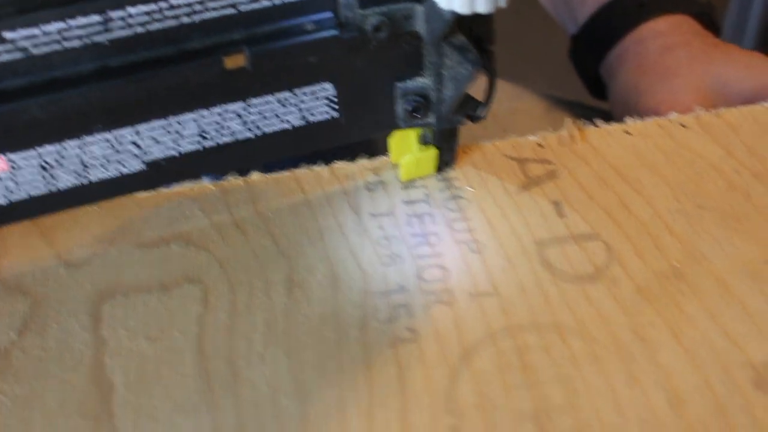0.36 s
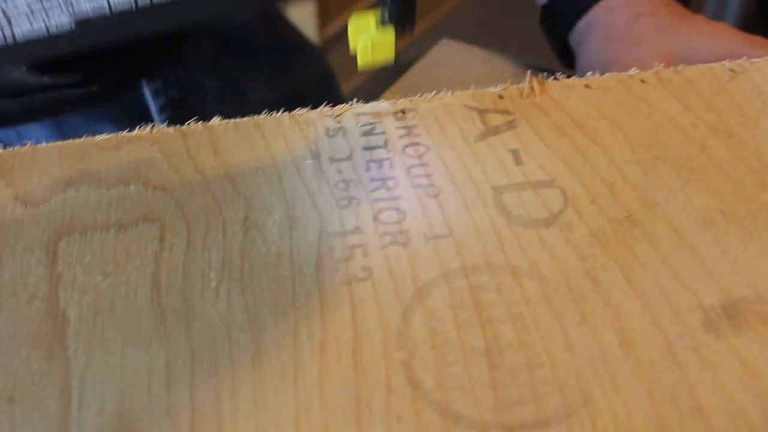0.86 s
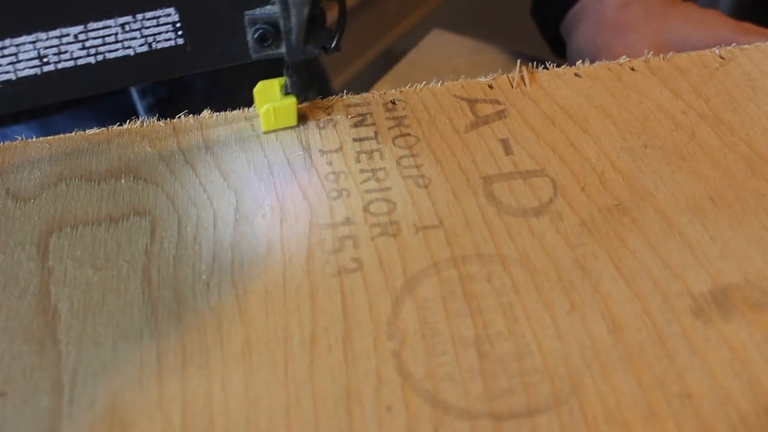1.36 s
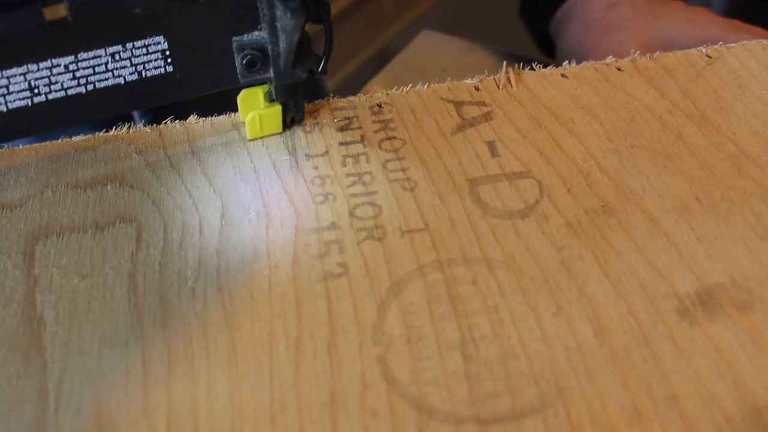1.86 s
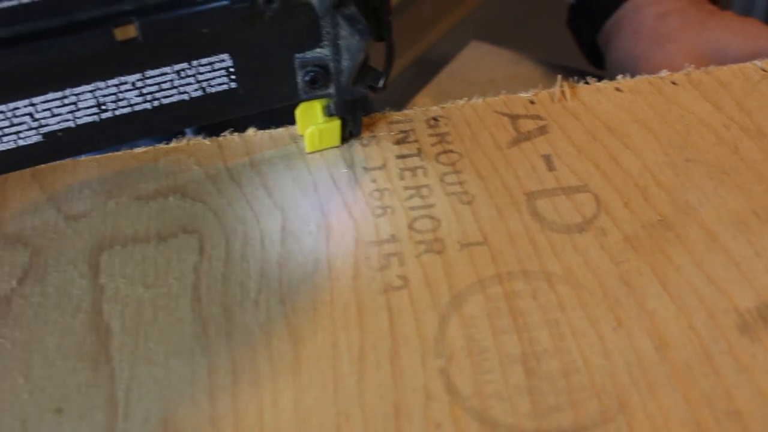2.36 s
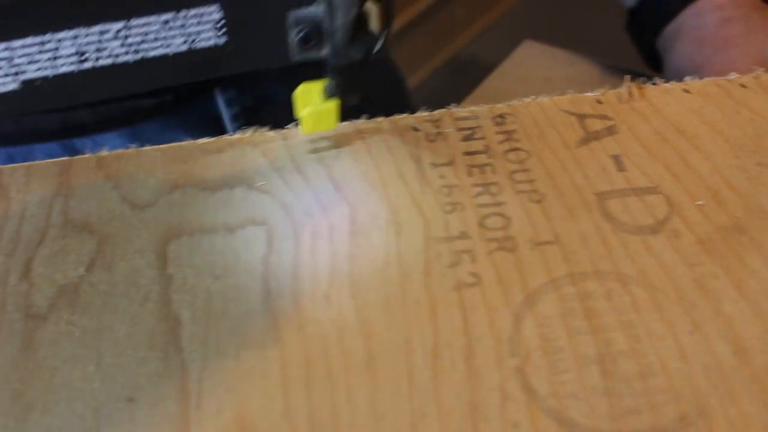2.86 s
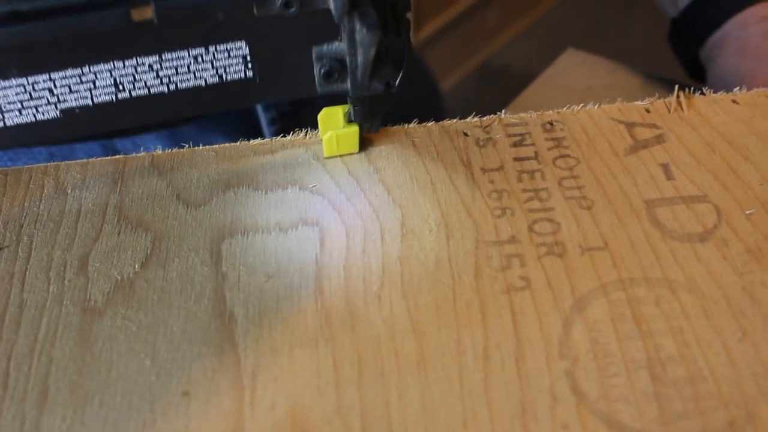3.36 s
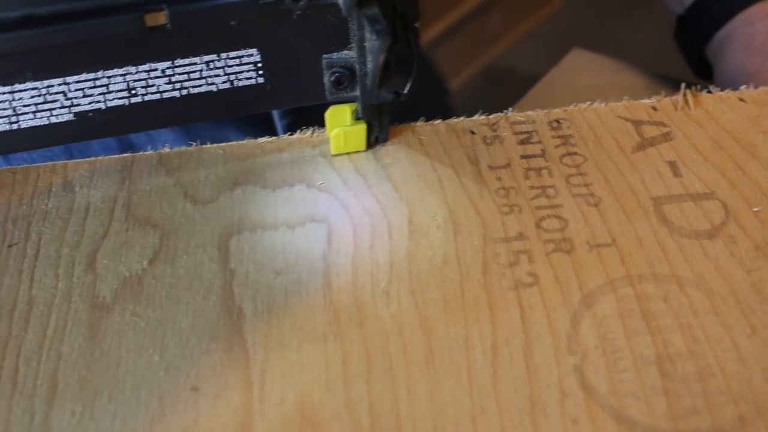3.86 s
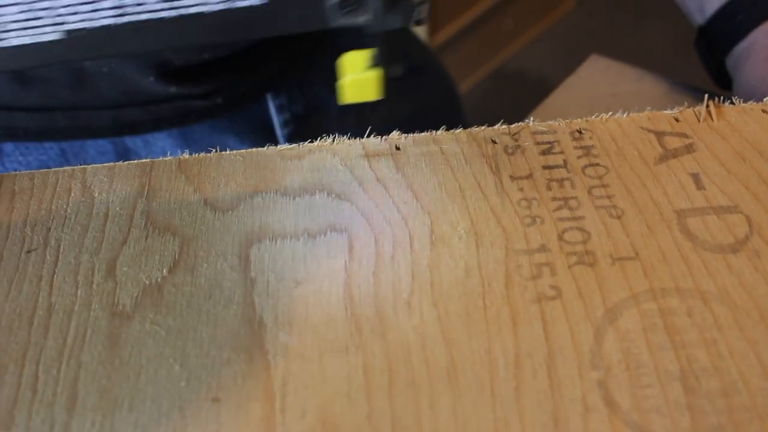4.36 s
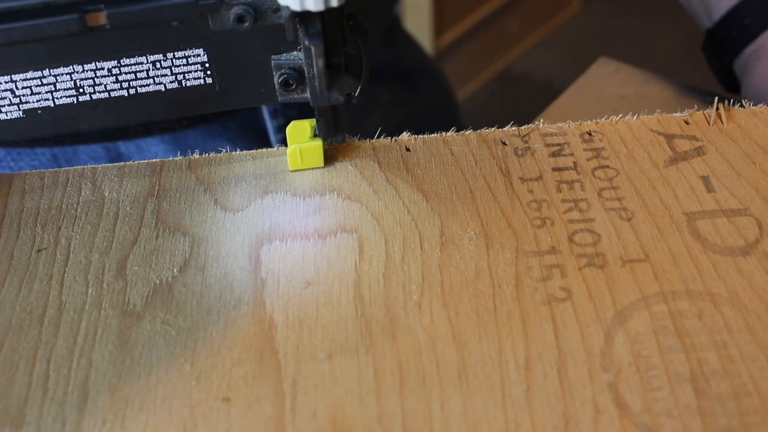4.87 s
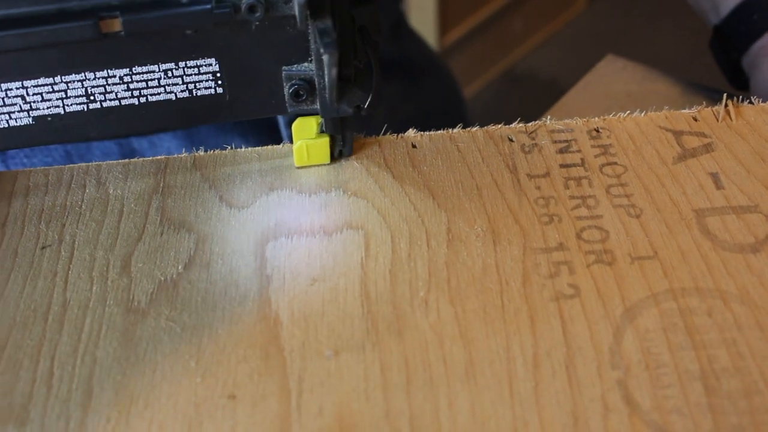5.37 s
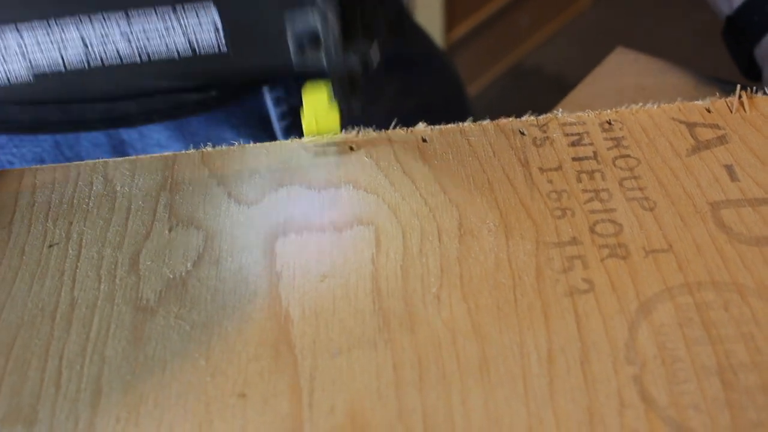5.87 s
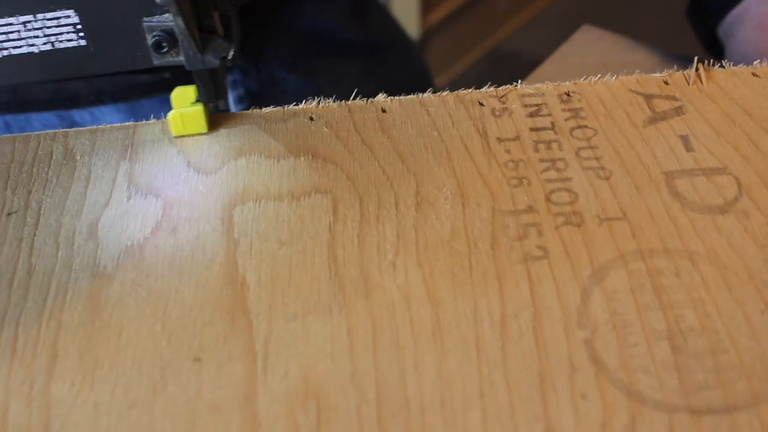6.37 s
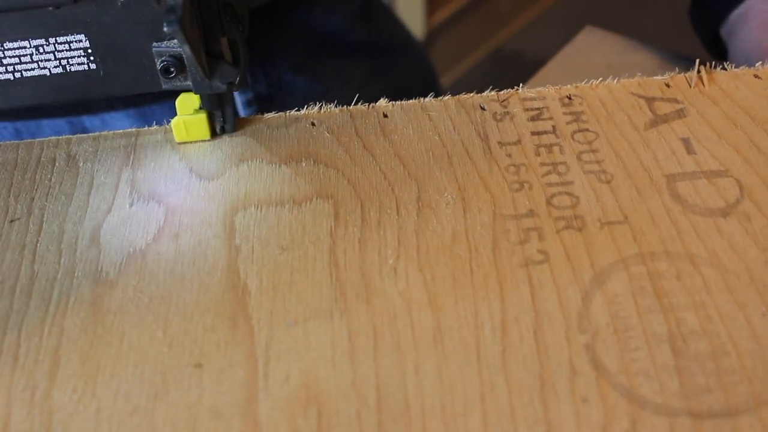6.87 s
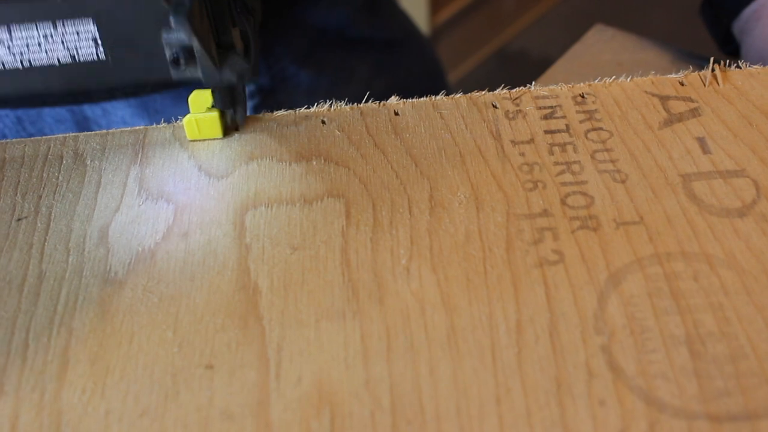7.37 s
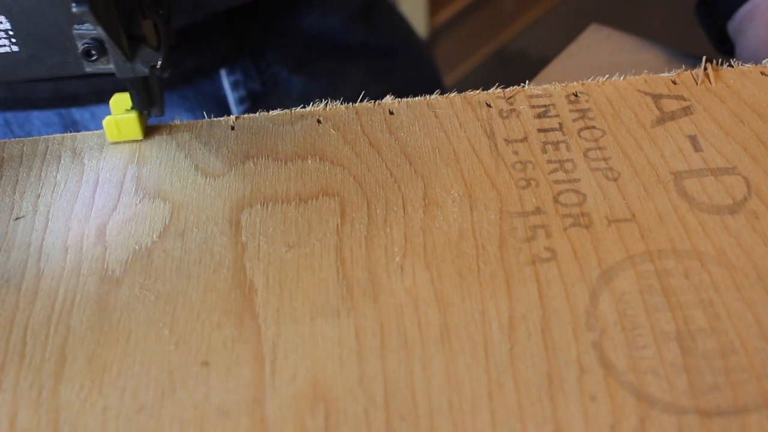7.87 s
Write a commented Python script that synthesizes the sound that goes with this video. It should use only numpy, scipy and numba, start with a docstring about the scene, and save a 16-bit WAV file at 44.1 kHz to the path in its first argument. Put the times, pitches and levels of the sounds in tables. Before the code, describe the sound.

A battery nailer works along a plywood panel in a workshop, very close to the microphone. Five times a trigger clicks, a geared motor whirs up and bogs down, a sharp loud shot cracks, a second metallic clack follows and the motor runs down. Between shots the nose bumps and scrapes the wood and loose parts click. Ventilation rushes steadily behind, dipping after the bangs and creeping back.

```python
"""A soft bump and a scrape on plywood come first, over a steady ventilation rush with faint machine tones.
Then a cordless brad nailer fires five nails in a workshop, close to one microphone. Each cycle has a trigger
click, a geared motor that slows as it packs air, the shot, the piston's return and a run-down.
Between shots the nose thumps and scrapes the panel, and nose, loose parts and latch knock and click.
The gain control ducks and creeps back; a second channel without microphone has only hiss and crosstalk."""
import sys
import numpy as np
from scipy import signal
from scipy.fft import rfft, irfft
from scipy.io import wavfile
from scipy.ndimage import uniform_filter1d
from numba import njit

SR = 44100
rng = np.random.default_rng(int(sys.argv[2]) if len(sys.argv) > 2 else 0)


def gain_from_db(level_db):
    """Convert decibel levels to linear amplitude factors (20 dB per decade)."""
    decades = np.asarray(level_db, float) / 20
    return 10 ** decades


def output_pcm(signal):
    """Save a mono or channel-first signal as 16-bit PCM at the path in sys.argv[1].

    Samples are clipped to [-1, 1] before scaling.
    """
    pcm = np.clip(np.atleast_2d(signal).T, -1, 1) * 32767
    wavfile.write(sys.argv[1], SR, np.round(pcm).astype(np.int16))


N = 362943  # length in samples

# All levels are relative, ahead of the gain control.


def rms1(x):
    """Scale to unit rms."""
    return x / np.sqrt(np.mean(x ** 2))


def colour(x, points):
    """Minimum-phase filter through (Hz, dB) points, scaled to unit energy."""
    hz, db = np.transpose(points)
    grid_hz = np.arange(1, 2050) * SR / 4096
    log_gain = np.interp(np.log(grid_hz), np.log(hz), db) * np.log(10) / 20
    # folding the cepstrum puts the whole response after the strike
    cepstrum = irfft(log_gain)
    cepstrum[1:2048] *= 2
    cepstrum[2049:] = 0
    h = irfft(np.exp(rfft(cepstrum)))
    return signal.oaconvolve(x, h / np.sqrt(np.sum(h ** 2)))[:N]


def ring(x, modes):
    """Fading sine modes (Hz, dB, seconds to fade 60 dB), together of unit energy, struck by x."""
    t = np.arange(SR // 4) / SR
    h = sum(gain_from_db(db) * np.sin(2 * np.pi * hz * t) * 1000. ** (-t / t60) for hz, db, t60 in modes)
    return signal.oaconvolve(x, h / np.sqrt(np.sum(h ** 2)))[:N]


def bursts(times, db, decay_s, rough=1.):
    """Short fading pushes; dB is the energy spread over 10 ms, rough the share of noise."""
    x = np.zeros(N + SR)
    t = np.arange(SR // 5) / SR
    noise = rng.standard_normal((len(times), len(t)))
    for s, level_db, grain in zip(times, np.broadcast_to(db, len(times)), noise):
        push = (1 - rough + rough * grain) * np.exp(-t / decay_s)
        first = int(s * SR)
        x[first:first + len(t)] += gain_from_db(level_db) * push * np.sqrt(SR / 100 / np.sum(push ** 2))
    return x[:N]


def walk(rate):
    """Smooth chance with unit spread, changing about rate times a second."""
    k = max(int(SR / rate), 2)
    return rms1(uniform_filter1d(uniform_filter1d(rng.standard_normal(N), k), k))


# tone of the ventilation rush: pitch_hz, level_db (per Hz)
RUSH_TONE = [(30, -30.5), (64, -30), (90, -0.5), (130, -5.5), (190, -1.5), (440, -4.5), (800, -2),
             (1160, -7.5), (1350, -10), (3600, -15.5), (6000, -20.5), (7900, -33.5), (16000, -46.5)]
# steady tones of a distant machine: pitch_hz, level_db
MACHINE_TONES = [(91.5, -49), (312, -49.5), (484.5, -46.5), (796.7, -46.5), (1120, -49), (3763, -52)]


def shop():
    """Ventilation is coloured noise; the distant machine is sines wavering in level and phase."""
    t = np.arange(N) / SR
    rush_db = -37 + 1.0 * walk(0.84) + 1.0 * walk(60)
    rush = colour(rng.standard_normal(N), RUSH_TONE) * gain_from_db(rush_db)
    tones = sum(gain_from_db(db + 2.0 * walk(8.7) + 2.5 * walk(1.2)) * np.sin(2 * np.pi * hz * t + 1.2 * walk(3.2))
                for hz, db in MACHINE_TONES)
    return rush + tones


# how the plywood panel rings: pitch_hz, level_db, fade_s (to fall 60 dB)
PANEL = [(97, -34, 0.035), (137.3, 2, 0.13), (191, -12.5, 0.13), (290, -6, .06), (306.6, -12, 0.14),
         (407, -5.5, 0.097), (595, -6, .04), (880, -12, .03)]
# tone of a dull knock on wood: pitch_hz, level_db (per Hz)
WOOD = [(200, -26), (310, 4), (500, 2), (1200, 1.5), (2500, -32)]
# soft landings of the nose on the panel: start_s, level_db
THUMPS = [(0.002, -19), (1.253, -42), (1.791, -45), (1.849, -22.5), (3.016, -27), (3.378, -41),
          (3.496, -28), (4.831, -36), (5.003, -40.5), (5.119, -18), (6.794, -25), (7.924, -36.5),
          (8.128, -36.5)]


def landings():
    """Soft pushes ring the panel, with a woody knock inside every landing."""
    start_s, level_db = np.transpose(THUMPS)
    thump = ring(bursts(start_s, level_db, 0.0008, rough=0.67), PANEL)
    # a free panel radiates no deep bass
    thump = signal.sosfilt(signal.butter(2, 70, "high", fs=SR, output="sos"), thump)
    return thump + colour(bursts(start_s, level_db - 7, 0.016), WOOD)


# how the tool's plastic shell and metal parts ring: pitch_hz, level_db, fade_s (to fall 60 dB)
TOOL = [(1670, 0, 0.02), (1907, 5.5, 0.04), (2295, -7.5, 0.02), (2780, 21.5, 0.0082), (3016, 3, 0.021),
        (3350, 1, .015), (4050, -7, 0.0069), (4850, 2, 0.026), (5640, -7.5, 0.018), (5900, -6.5, .012),
        (6580, -3, 0.0085), (7890, -21, .01), (9000, -5.5, .01), (10500, -0.5, 0.014),
        (13900, -11.5, 0.011)]
# tone of clattering gears, also heard in clicks and scrapes: pitch_hz, level_db (per Hz)
CLATTER = [(35, -69.5), (60, -69.5), (238, -7.5), (274, -8.5), (323, -5), (371, -7.5), (803, -5.5),
           (2900, 0), (4220, 3), (5330, 3), (16000, -25.5)]
# knocks and clicks: nose contacts, loose parts, and the tool's latch after a return:
# start_s, wood_knock_db, tool_click_db
KNOCKS = [(0.184, -57.5, -36.5), (0.799, -9, -29.5), (1.253, -44, -22), (1.267, -29, -26.5),
          (1.508, -37, -28.5), (1.529, -33.5, -33.5), (1.6, -37.5, -44), (1.65, -50, -38),
          (1.697, -36, -34), (1.733, -30, -35), (1.761, -23.5, -26.5), (1.791, -31.5, -23),
          (1.815, -27, -36), (1.824, -38, -30.5), (2.709, -11, -4), (3.017, -15.5, -33.5), (3.033, -35, -9),
          (3.038, -18.5, -19), (3.089, -44, -18), (3.098, -29, -28), (3.171, -42.5, -32.5),
          (3.23, -34, -28.5), (3.453, -52, -31), (3.473, -32.5, -29.5), (4.831, -24.5, -35),
          (4.853, -21.5, -17.5), (5.002, -31, -43.5), (5.1, -45, -29.5), (5.871, -17, -19),
          (6.369, -39, -23.5), (6.45, -40, -31), (6.6, -36.5, -36), (6.763, -49, -32), (7.438, -32, -3),
          (7.925, -33, -18.5), (8.147, -37.5, -27)]


def knocks_and_clicks():
    """Each event knocks the wood and clicks the tool, striking its modes with a new balance each time."""
    start_s, knock_db, click_db = np.transpose(KNOCKS)
    knock = colour(bursts(start_s, knock_db, 0.011), WOOD)
    knock = knock + ring(bursts(start_s, knock_db - 1.5, 0.0015), PANEL[3:5])
    energy = np.array([gain_from_db(db) ** 2 * t60 for _, db, t60 in TOOL])
    balance_db = 5.5 * rng.standard_normal((len(start_s), len(TOOL)))
    share_db = 7.5 * np.log10(energy / energy.sum()) + balance_db
    click = sum(ring(bursts(start_s, click_db - 9 + db, .0012), [mode])
                for mode, db in zip(TOOL, share_db.T))
    return knock + click + colour(bursts(start_s, click_db - 4, 0.0031), CLATTER)


# the nose slides over the grain: peak_s, level_db, fade_s (to fall 20 dB; 0 stops at once)
SCRAPES = [(0, -35, .25), (1.80, -36.5, 0.5), (3.04, -16, 0.0469), (3.47, -52.5, 2.7), (4.861, -28.5, 0),
           (5.12, -42, 0.1), (6.8, -53.5, 2), (7.94, -39.5, .06)]


def scrapes():
    """Dragging over the grain is crackling noise that swells to each peak and fades."""
    t = np.arange(N) / SR
    rise_s = 0.021  # to grow 20 dB
    slide = sum(gain_from_db(db - 20 * np.where(t < peak, (peak - t) / rise_s, (t - peak) / fade))
                for peak, db, fade in SCRAPES)
    return colour(slide * gain_from_db(1.0 * walk(400)) * rng.standard_normal(N), CLATTER)


# the five nailing cycles: trigger_s, motor_start_s, shot_s, return_s
CYCLES = [(.2735, .297, .5565, .686), (2.154, 2.177, 2.432, 2.550), (3.745, 3.767, 4.020, 4.158),
          (5.345, 5.369, 5.627, 5.755), (6.900, 6.926, 7.181, 7.310)]
# strength of each cycle: motor_db, shot_db, return_db
FORCE = [(3, 23, 27), (3, 26.5, 26.5), (3, 29, 27.5), (3, 30.5, 28.5), (3, 27, 30)]
# the motor speeds up, bogs down on packed air, is freed by the shot and coasts:
# age_s (on a standard cycle), gear_mesh_hz, clatter_db
SPIN = [(0, 501.5, -16.5), (.006, 750, -13), (.03, 1808, -10), (.07, 2517, -6), (.131, 2799, -5.5),
        (.17, 2539, -3.5), (.256, 1149, -3.5), (.28, 1686, 6.5), (.32, 2465, -0.5), (.385, 2610, 4.5),
        (.47, 1998, -4), (.5, 1516, -21), (.58, 498.7, -62.5)]
# the housing favours the upper whine: pitch_hz, level_db
SHELL = [(2500, -11), (3800, -2.5), (4800, 2), (5800, 4.5), (7500, -22)]


def motor():
    """Gear clatter that throbs once a shaft turn, a ragged mesh whine with its octave, knocks in the shell."""
    t = np.arange(N) / SR
    shot_age, return_age = .256, .384  # s; every cycle is stretched to pass these on time
    age = np.full(N, 9.)  # beyond the end of SPIN: silent
    motor_db = np.zeros(N)
    for (_, start, shot, back), (level_db, _, _) in zip(CYCLES, FORCE):
        on = t >= start
        age[on] = np.interp(t[on], [start, shot, back, back + 1], [0, shot_age, return_age, return_age + 1])
        motor_db[on] = level_db
    age_s, *columns = np.transpose(SPIN)
    mesh_hz, clatter_db = (np.interp(age, age_s, column) for column in columns)

    load = np.where(age < shot_age, age / shot_age, 0)  # air pressure builds until the shot
    whine_db = clatter_db - 12 + 9.5 * load
    teeth = np.cumsum(mesh_hz * (1 + 0.024 * walk(90))) / SR  # gear teeth passed so far
    turn = teeth / 16  # 16 teeth to a shaft turn
    size = gain_from_db(3.0 * rng.standard_normal(N // 100))[turn.astype(int)]  # every turn strikes differently
    throb = size * np.exp(-(turn % 1) / .12)

    rough = rng.standard_normal(N) * (.9 + 1.1 * throb) * gain_from_db(1.6 * walk(60))
    clatter = colour(rough, CLATTER)
    knocks = gain_from_db(-11.0) * ring(rng.standard_normal(N) * throb ** 2, TOOL[6:10])
    # loose parts rattle on their own, each in its own resonance
    rattle = sum(ring(rng.standard_normal(N) * gain_from_db(mode[1] - 15.5 + 5.3 * walk(72)), [mode])
                 for mode in TOOL[:12:2])

    octave = colour(walk(550) * np.sin(4 * np.pi * teeth), SHELL)
    shaft = sum(walk(40) * np.sin(2 * np.pi * k * turn) for k in (1, 2, 4))
    mesh = walk(330) * np.sin(2 * np.pi * teeth)
    whine = gain_from_db(-14) * shaft + mesh + gain_from_db(-3) * octave
    running = age < age_s[-1]
    return running * gain_from_db(motor_db) * (gain_from_db(clatter_db) * (clatter + knocks + rattle) + gain_from_db(whine_db) * whine)


# tone of the trigger's snap: pitch_hz, level_db (per Hz)
SNAP = [(500, -24.5), (1580, 2.5), (2100, -18.5), (2700, 2), (3600, -6.5), (5000, 6.5), (7000, 0.5),
        (9000, -14.5), (11000, -1.5), (16000, -18.5)]


def trigger():
    """The trigger snaps and rings the tool, then the starting motor gives a dull jolt."""
    trigger_s, start_s, _, _ = np.transpose(CYCLES)
    snap = colour(bursts(trigger_s, -9, 0.00092), SNAP) + ring(bursts(trigger_s, -23.5, 0.0069), TOOL)
    return snap + colour(bursts(start_s + 0.0033, -15, 0.0066), WOOD)


def shove(times, db, decay_s):
    """A blow shoves the whole bench: one slow swing."""
    return ring(bursts(times, db, decay_s, rough=0), [(99, 0, 0.023)])


# tone of the piston's return: pitch_hz, level_db (per Hz)
RETURN = [(30, -27.5), (190, -7), (500, -9), (1220, -24.5), (1670, -6), (2230, -10), (2900, -6.5),
          (4080, -4), (11400, -20.5), (16000, -44.5)]


def piston_return():
    """The piston hits its stop and bounces 9 ms later, with a latch click, a panel knock and a bench shove."""
    back_s, back_db = np.transpose(CYCLES)[3], np.transpose(FORCE)[2]
    hit = bursts(back_s, back_db, .0025)
    bounce = bursts(back_s + .009, back_db - 4, .004)
    stop = colour(hit + bounce, RETURN)
    latch = ring(bursts(back_s - .002, back_db - 18, .001), TOOL)
    knock = ring(bursts(back_s, back_db - 24, 0.0004, rough=0), PANEL[5:6])
    return stop + latch + knock + shove(back_s, back_db - 24.5, 0.00089)


# tone of the shot: pitch_hz, level_db (per Hz)
SHOT = [(30, -23.5), (200, -4.5), (800, 3.5), (1220, -5), (1600, 1.5), (2750, -1.5), (4190, -7.5),
        (5040, -2.5), (8080, -18.5), (12600, -19.5), (16000, -25.5)]


def nail_shot():
    """A crack of noise that rings one tool mode, an air blast 13 ms later, and a shove to the bench."""
    shot_s, shot_db = np.transpose(CYCLES)[2], np.transpose(FORCE)[1]
    crack = colour(bursts(shot_s, shot_db - 4, 0.008), SHOT)
    tool_ring = ring(bursts(shot_s, shot_db - 7, 0.00089), TOOL[2:3])
    blast = colour(bursts(shot_s + .013, shot_db - 1.5, .009), SHOT)
    return crack + tool_ring + blast + shove(shot_s, shot_db - 33.5, 0.0004)


def room(near):
    """Echo off the walls: noise that starts after 6 ms and fades at 60 dB per 0.34 s."""
    t = np.arange(SR) / SR
    echo = rng.standard_normal(SR) * 1000. ** (-t / 0.34) * (t > .006)
    wet = signal.oaconvolve(near, echo / np.sqrt(np.sum(echo ** 2)))[:N]
    return gain_from_db(-23) * colour(wet, [(100, -4), (1000, 7), (5000, 3), (9000, -5)])


def scene():
    """The tool up close, its echo and the shop behind; the second channel is empty."""
    handling = landings() + knocks_and_clicks() + scrapes()
    near = handling + motor() + trigger() + piston_return() + nail_shot()
    return np.array([shop() + room(near) + near, np.zeros(N)])


@njit
def agc(x, pull, most, fast, slow, knee):
    """Gain factor: output power pulls its dB down; it climbs fast up to a knee, then slowly to 0 dB."""
    gain, db = np.empty(len(x)), 0.
    for i in range(len(x)):
        gain[i] = 10 ** (db / 20)
        power = min((gain[i] * x[i]) ** 2, most)  # the detector saturates
        climb = fast if db < knee else slow
        db = min(db + (climb - pull * power) / SR, 0.)
    return gain


def roll_off(x):
    """The treble ends steeply here."""
    return signal.sosfilt(signal.butter(12, 16730, fs=SR, output="sos"), x)


def record(dry):
    """The input stage overloads, the gain control follows, and the converter clips."""
    # the capsule vents deep bass
    dry = signal.sosfilt(signal.butter(1, 60, "high", fs=SR, output="sos"), dry)
    rail = gain_from_db(23.5)
    mic = rail * np.tanh(dry[0] / rail)
    hiss = gain_from_db(-58.0) * rng.standard_normal((2, N))
    leak = gain_from_db(-69) * np.diff(dry[0] - mic, prepend=0)  # the overload's edges couple across
    # pull in dB/s per unit power, climbs in dB/s, knee in dB
    gain = agc(mic, pull=4200.0, most=0.28, fast=70.0, slow=17.0, knee=-14.0)
    mix = np.clip(gain * (np.array([mic, leak]) + hiss), -1, 1)
    return roll_off(mix)


dry = scene()
out = record(dry)
output_pcm(out)
```